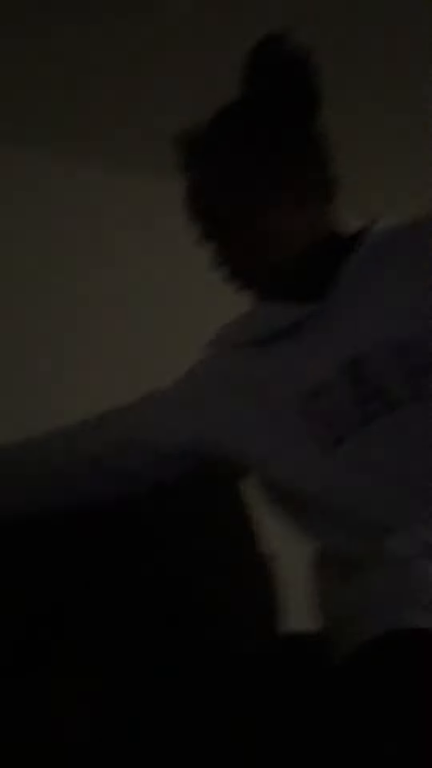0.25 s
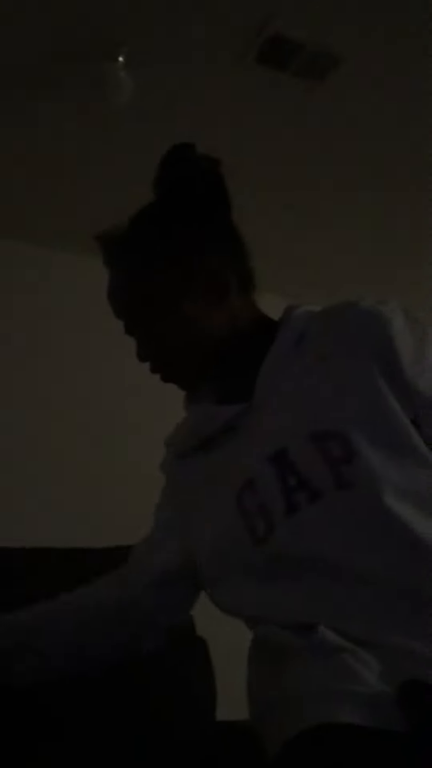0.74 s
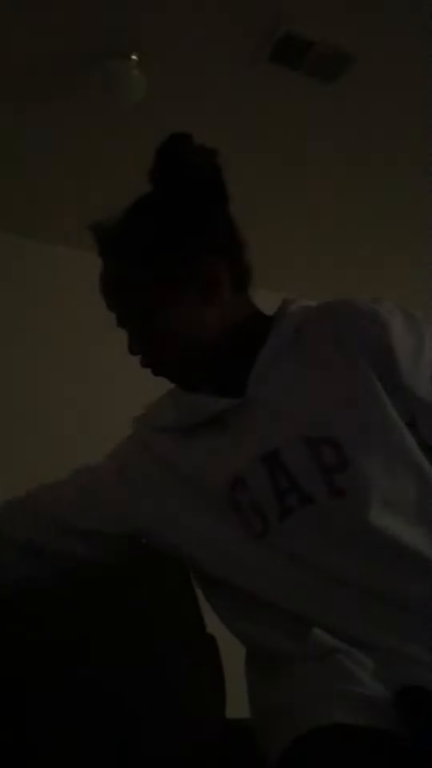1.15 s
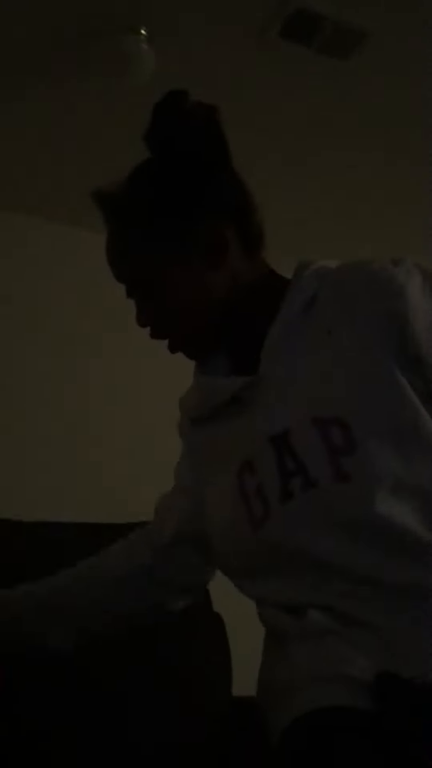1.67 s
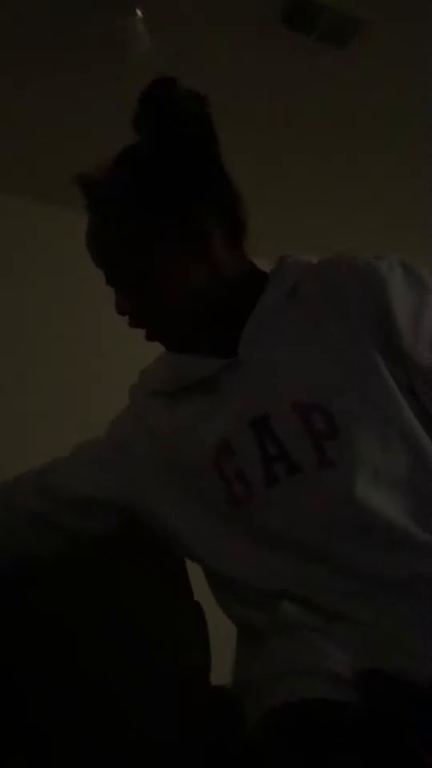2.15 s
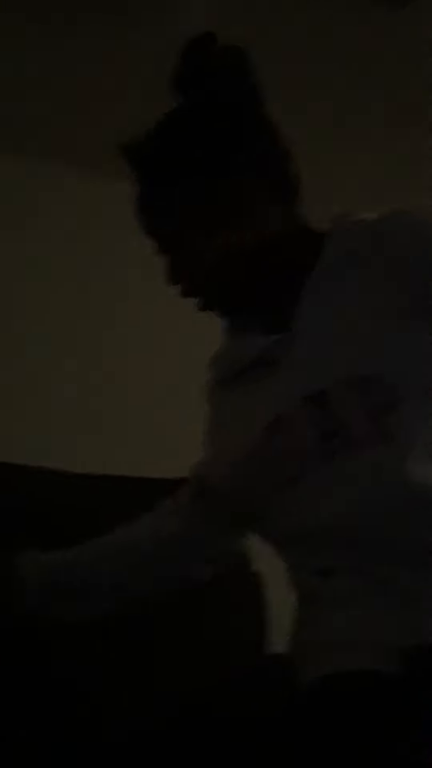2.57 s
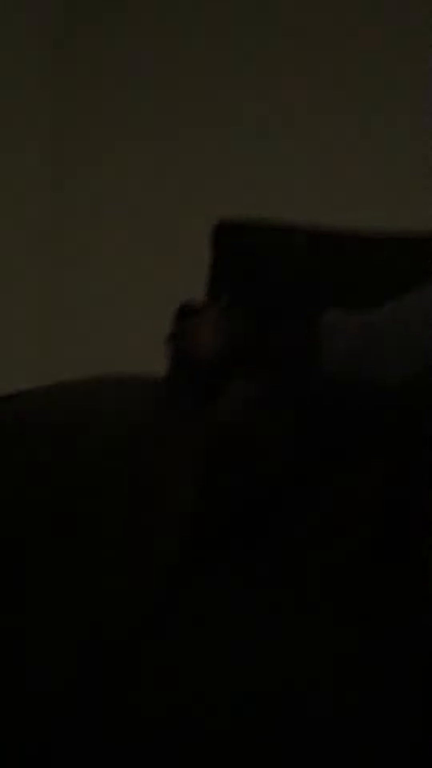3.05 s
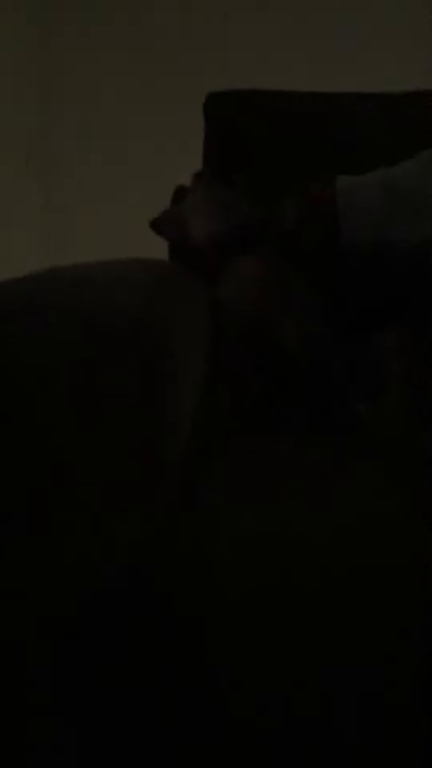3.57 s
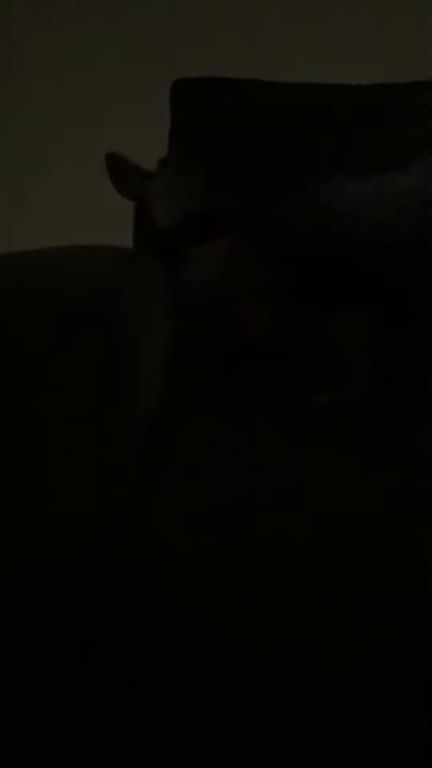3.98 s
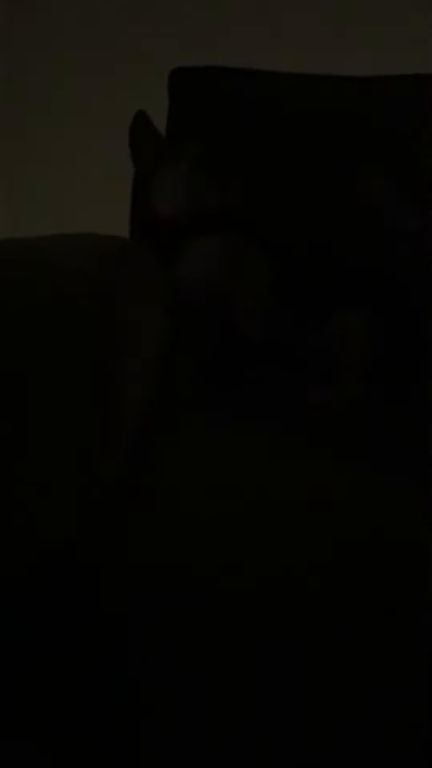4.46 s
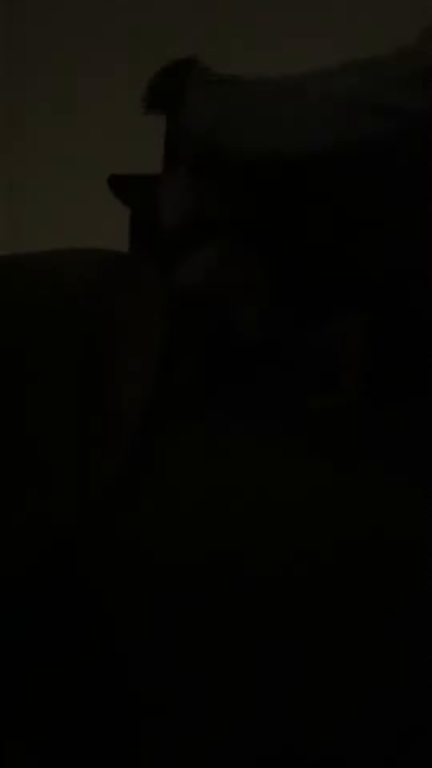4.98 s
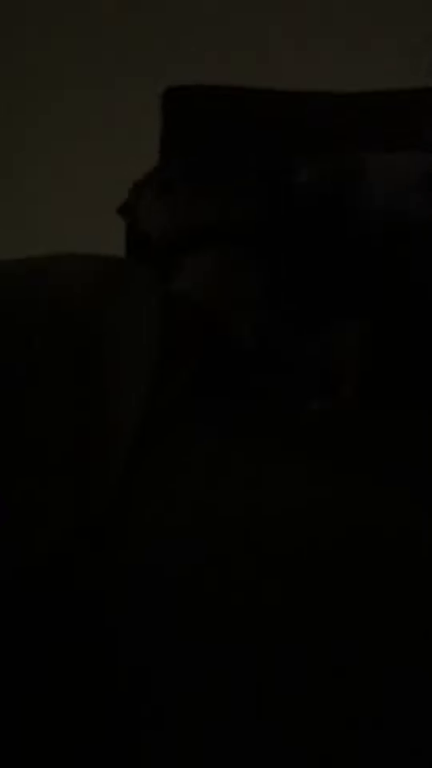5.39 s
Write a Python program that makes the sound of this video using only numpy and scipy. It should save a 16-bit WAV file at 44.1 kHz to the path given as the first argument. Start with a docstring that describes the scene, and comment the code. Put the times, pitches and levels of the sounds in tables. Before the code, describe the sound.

A hand squeezes a small rubber toy in a quiet furnished room. Tiny, bright, reedy chirps come at an even pace of just over two a second, then slow to three separated squeaks, the last loudest and highest. Each leaves a short room ring. Faint cloth rustles and dull ticks appear between, over smooth microphone hiss and a low distant hum.

```python
"""Rubber squeak toy in a furnished room

A hand squeezes a rubber toy: at each squeeze a reed squeaker chirps for some 40-50 ms. The reed gives
a pulse train of gliding pitch, the toy's resonances colour it, and the room rings on.
Cloth rustles faintly as swelling noise with small dull ticks; an appliance hums far off as wavering
sine lines over a low rumble; and a small microphone adds a smooth hiss."""
import sys
import numpy as np
from scipy import signal
from scipy.fft import rfft, irfft, next_fast_len
from scipy.io import wavfile
from scipy.ndimage import map_coordinates

SR = 44100
rng = np.random.default_rng(int(sys.argv[2]) if len(sys.argv) > 2 else 0)


def nominal_scale(level):
    """Amplitude ratio for a level in decibels (scalar or array-like)."""
    x = np.asarray(level, float) / 20
    return 10 ** x


def int16_out(signal):
    """Quantize to a 16-bit WAV file."""
    q = np.round(np.clip(np.atleast_2d(signal).T, -1, 1) * 32767)
    wavfile.write(sys.argv[1], SR, q.astype(np.int16))


N = 248150  # samples in the scene
LEAD = SR // 2  # samples before time zero, so that an earlier squeak can still ring
STIR_S = .008  # the reed stirs this long before it speaks
TOP_HZ = 15850  # upper band limit


def unit(x):
    """Normalization: scales a signal to rms 1."""
    return x / np.sqrt(np.mean(x ** 2) + 1e-20)


def along(points, hz):
    """Logarithmic frequency scale: interpolates (f/Hz, value) points on it."""
    f, value = np.transpose(points)
    return np.interp(np.log(hz + 1), np.log(f + 1), value)


def wobble(length, rate):
    """Band-limited fluctuation: a spline through random knots, rate of them a second."""
    knots = rng.standard_normal(int(length * rate / SR) + 4)
    return map_coordinates(knots, [np.arange(length) * rate / SR])


def filtered(x, response):
    """Linear filtering: the spectrum times a complex response of frequency."""
    size = 2 * next_fast_len(len(x) // 2 + 2048)
    spectrum = rfft(x, size) * response(np.fft.rfftfreq(size, 1 / SR))
    return irfft(spectrum, size)[:len(x)]


def noise(spectrum):
    """Coloured noise: white noise shaped by a spectral envelope, at rms 1."""
    white = rng.standard_normal(N)
    return unit(filtered(white, lambda hz: nominal_scale(along(spectrum, hz))))


def causal(gain):
    """Minimum phase: folding the cepstrum onto positive time gives the causal response of this gain."""
    cepstrum = irfft(np.log(gain + 1e-6))
    half = len(cepstrum) // 2
    cepstrum[1:half] *= 2
    cepstrum[half + 1:] = 0
    return np.exp(rfft(cepstrum))


def hiss():
    """Microphone self-noise: stationary coloured noise whose level barely drifts."""
    # microphone noise spectrum: f/Hz, relative density level/dB
    density = [(82, -42), (140, -9.5), (181, -7), (305, -11), (473, -15.5), (512, -19), (827, -16),
               (1330, -16), (2580, -22), (4880, -29.5), (13500, -35.5), (15500, -35), (16500, -58)]
    drift_db = 0.17 * wobble(N, 1.7)
    return nominal_scale(-56.5 + drift_db) * noise(density)


def rumble():
    """Modulated low-frequency noise: a slow level course with random lumps on it."""
    # rumble spectrum: f/Hz, relative density level/dB
    density = [(12, -60), (20, -22.5), (46, -5), (59, 8), (76, -1.5), (95, 1), (120, -31.5), (210, -120)]
    # course of the rumble before its lumps: t/s, level/dB
    course = [(0, -56), (.6, -54), (1.4, -60), (2.5, -53), (3.3, -52), (3.95, -60), (4.5, -52), (5.63, -50)]
    course_db = np.interp(np.arange(N) / SR, *np.transpose(course))
    lumps_db = 1.5 * wobble(N, 4)
    return nominal_scale(course_db + lumps_db) * noise(density)


def hum():
    """Line spectrum: sinusoids broadened by small random changes of level and frequency."""
    # lines of the far appliance: mean f/Hz, mean rms level/dB, scale of frequency wander/Hz
    lines = [(58.2, -64.5, 2.6), (104.9, -54, 1.5), (185, -71, 6.6), (226, -70.5, 1), (477, -72.5, 2)]
    total = np.zeros(N)
    for hz, db, width in lines:
        level = np.sqrt(2) * nominal_scale(db + 0.61 * wobble(N, 22))
        phase = 2 * np.pi * np.cumsum(hz + width * wobble(N, 15)) / SR
        total += level * np.sin(phase)
    return total


def cloth():
    """Friction noise: grainy coloured noise under envelopes that rise and fall exponentially."""
    # quick creases of cloth: t/s, peak level/dB
    snaps = [(2.409, -57), (2.91, -61), (5.239, -49.5), (5.32, -58)]
    # slow rubs of cloth and cushion: t/s, peak level/dB, rise and fall time constant/s
    rubs = [(4.101, -56, 0.08), (4.4, -61, .06), (4.569, -55, .036), (5.08, -57, 0.038), (5.47, -57, 0.077)]
    # cloth spectrum before its grain: f/Hz, relative density level/dB
    density = [(500, -27), (1200, -6.5), (4000, 3.5), (7000, 3.5), (12000, 1.5), (16000, 4)]
    snap_rise_s, snap_fall_s = .004, .031
    moves = [(s, db, snap_rise_s, snap_fall_s) for s, db in snaps]
    moves += [(s, db, width, width) for s, db, width in rubs]
    t = np.arange(N) / SR
    swell = np.zeros(N)
    for s, db, rise, fall in moves:
        exponent = np.where(t < s, (t - s) / rise, (s - t) / fall)
        swell += nominal_scale(db) * np.exp(exponent)
    grain_db = 1.4 * wobble(N, 150)
    return swell * unit(noise(density) * nominal_scale(grain_db))


def ticks():
    """Damped free vibration: sinusoids that decay by 60 dB in 20 ms."""
    # small dull ticks: t/s, initial level/dB, f/Hz
    knocks = [(2.031, -43, 394), (2.838, -46, 804), (5.083, -43, 900)]
    t = np.arange(N) / SR
    total = np.zeros(N)
    for s, db, hz in knocks:
        since = np.maximum(t - s, 0)
        total += nominal_scale(db - 60 * since / 0.02) * np.sin(2 * np.pi * hz * since)
    return total


def room():
    """Reverberation: discrete early reflections, then a tail in which each frequency has its own decay."""
    # reverberant tail: f/Hz, 60 dB decay time/s, energy level/dB
    reverberation = [(1300, .42, -9), (3000, .45, -8), (6000, .45, -8), (10000, .3, -8), (16000, .2, -10)]
    # first reflections: nominal delay/ms, level/dB
    walls = [(2.1, -11.5), (4.6, -17), (7.3, -20), (10.4, -14.5), (14.2, -15.5), (19, -15)]
    bands, t60, db = np.transpose(reverberation)
    hz, t, z = signal.stft(rng.standard_normal(int(.7 * SR)), SR, nperseg=256)
    t60 = along(np.c_[bands, t60], hz)[:, None]
    db = along(np.c_[bands, db], hz)[:, None]
    # the root divides out the decay time, so that the level column alone sets the energy
    decay = nominal_scale(db - 60 * t / t60) / np.sqrt(t60 * SR / (2 * np.log(1000)))
    tail = signal.istft(z * decay, SR, nperseg=256)[1]
    tail = tail * np.clip((np.arange(len(tail)) / SR - .003) / 0.0048, 0, 1)  # fades in from 3 ms
    ms, wall_db = np.transpose(walls)
    moved = rng.uniform(.85, 1.15, len(ms))  # the toy is never quite in the same place
    sign = np.sign(rng.standard_normal(len(ms)))
    tail[(ms * moved * SR / 1000).astype(int)] += nominal_scale(wall_db) * sign
    return tail


def squeeze(start, hold, let_go, db, first_hz, turn_hz, last_hz):
    """Pressure-controlled pitch: rows (t/s, f/Hz, level/dB) of bite, glide with one turn, and let-go."""
    turn = .4  # share of the hold after which the pitch changes course
    # the reed cannot be driven much above its ceiling; a larger knee bends more sharply
    ceiling_hz, knee = 2350., 14.
    bite_db, bite_s = 2, .004  # the first push of the fingers is harder than the hold
    swell_db_per_hz, droop_db_per_hz = .007, .0265  # above, below the starting pitch
    sag_hz_per_s = 45000  # pitch fall as the hand lets go
    # the further above its stall pitch, the more level the reed loses in the let-go
    stall_hz, fade_db_per_hz = 1050, .019

    s = np.linspace(0, hold, num=16)
    driven = np.interp(s, [0, turn * hold, hold], [first_hz, turn_hz, last_hz])
    hz = (driven ** -knee + ceiling_hz ** -knee) ** (-1 / knee)
    slope = np.where(hz > hz[0], swell_db_per_hz, droop_db_per_hz)
    level = db + slope * (hz - hz[0]) + bite_db * np.exp(-s / bite_s)
    end_hz = hz[-1] - sag_hz_per_s * let_go
    end_db = level[-1] - fade_db_per_hz * (hz[-1] - stall_hz)
    rows = np.vstack([np.c_[s, hz, level], (hold + let_go, end_hz, end_db)])
    return rows + [start, 0, 0]


def reed(rows):
    """Self-sustained reed: it snaps shut once a cycle, a harmonic pulse train with air noise in step."""
    s, hz, db = np.transpose(rows)
    t = np.arange(int((s[-1] - s[0] + 0.0035 + STIR_S) * SR)) / SR - STIR_S
    now = t + s[0]
    speaking = np.maximum(t, 0)
    held_hz = np.interp(now, s, hz)
    pressure_db = np.interp(now, s, db)
    overblown = np.clip((held_hz - 1600) / 300, 0, 1)  # driven far above rest pitch it beats unevenly
    slack = np.clip((now - s[-2]) / (s[-1] - s[-2]), 0, 1)  # grows from 0 to 1 over the let-go

    scoop = 1 - .06 * np.exp(-speaking / .0012)  # starts a little flat
    jitter = 1 + .0032 * (1 + 3 * overblown) * wobble(len(t), 300)
    pitch = held_hz * scoop * jitter
    phase = 2 * np.pi * np.cumsum(pitch) / SR

    k = np.arange(1, 16)[:, None]  # harmonic numbers
    # higher overtones waver more as the fingers move
    flutter_db = 1.22 * np.array([wobble(len(t), 91.6) for _ in k]) * np.sqrt(k)
    soft_db = -2.5 * k * slack  # a slack reed closes gently and loses its overtones
    audible = k * pitch < TOP_HZ + 900
    pulses = np.sum(nominal_scale(flutter_db + soft_db) * np.cos(k * phase) * audible, axis=0)

    # a harder squeeze blows more air past the reed, and so does the let-go
    air_db = -18.5 + 0.21 * (pressure_db + 12) + 7 * slack + 6 * overblown
    air = nominal_scale(air_db) * rng.standard_normal(len(t)) * (1 + np.cos(phase))

    onset = 1 - np.exp(-(speaking / 0.0008) ** 2)
    release = np.exp(-np.maximum(now - s[-1], 0) / 0.0031)
    # it swings freely before it first shuts
    stirring = nominal_scale(-13) * np.exp(-np.abs(t) / .0016) * (np.cos(phase) + np.cos(2 * phase))
    return ((pulses + air) * onset * release + stirring) * nominal_scale(pressure_db)


def modes(table, f):
    """Resonance: summed power gain of modes, each applied twice so that the valleys stay dark."""
    total = 0
    for center, width, db in table:
        damping = (f * width) ** 2
        resonance = damping / ((center * center - f * f) ** 2 + damping)
        total = total + nominal_scale(db) ** 2 * resonance ** 2
    return total


def body_gain(f, shades_db):
    """Modal superposition: the powers of the toy's resonance groups add, each shaded by its own level."""
    # six groups, low to high: hollow, belly, neck, nozzle, edge, top
    # each mode: f/Hz, width before it is applied twice/Hz, level before shading/dB
    pipe = [
        [(1380, 1300, -2)],
        [(2070, 1700, -2.5), (2790, 1400, -1)],
        [(4260, 1000, 0.5)],
        [(5804, 1100, 0), (6167, 1130, 2), (6800, 640, -6.5)],
        [(9080, 2200, 2), (11670, 2500, 2)],
        [(14420, 1600, 3.5), (15500, 1100, -8)],
    ]
    return np.sqrt(sum(nominal_scale(db) ** 2 * modes(part, f) for db, part in zip(shades_db, pipe)))


def toy():
    """Source-filter principle: each reed chirp excites the toy as it is held, then the room."""
    # squeezes: start t/s, hold/s, let-go/s, pressure level before bite and pitch changes/dB,
    # driven reed pitch before the ceiling at the start, turn and end of the hold: f/Hz, f/Hz, f/Hz
    presses = [(-.21, 0.042, .01, -23, 1308, 1430, 1430), (0.3271, .0325, 0.0096, -17, 1402, 1590, 1570),
               (0.754, .038, 0.0073, -23, 1325, 1420, 1375), (1.2416, .05, 0.0024, -22.5, 1301, 1258, 1186),
               (1.6821, .048, 0.0016, -24.5, 1253, 1248, 1138),
               (2.123, 0.034, 0.0075, -19.5, 1343, 1390, 1402),
               (2.5605, .042, 0.0048, -25, 1236, 1255, 1271),
               (2.9479, .046, 0.0012, -22.5, 1248, 1195, 1090),
               (3.8169, .0332, 0.013, -15, 1320, 1398, 1660), (4.887, .039, .011, -20, 1495, 1495, 1555),
               (5.554, .034, 0.0085, -11.5, 1500, 1714, 2520)]
    # how the hand shades the toy at each squeeze: belly level/dB, neck level/dB, nozzle level/dB, top level/dB
    grips = [(-13.5, -14.5, -0.5, -22.5), (-6, -9.5, 0.5, -17), (-2, -10, -2, -7.5), (-6.5, -9.5, 2, -17),
             (-7, -9, -3.5, -15.5), (-5.5, -9, -2.5, -10.5), (-6, -13, -5, -18), (-7, -15, -5.5, -19),
             (-2.5, -14.5, -3, -15), (-5, -7, -4, -6.5), (-3.5, -40, -2, -19)]
    out = np.zeros(N + LEAD + SR)
    for press, (belly_db, neck_db, nozzle_db, top_db) in zip(presses, grips):
        rows = squeeze(*press)
        hollow_db = -13 - 1.5 * (press[3] + 20)  # the lowest resonance weakens with pressure
        edge_db = -20
        shades_db = (hollow_db, belly_db, neck_db, nozzle_db, edge_db, top_db)
        source = np.pad(reed(rows), (0, SR // 100))
        direct = filtered(source, lambda f: causal(body_gain(f, shades_db)))
        # a louder squeak is nearer or aimed at the microphone, so drier
        near_db = np.max(rows, axis=0)[2] + 18
        sound = nominal_scale(-.22 * near_db) * signal.fftconvolve(direct, room())
        sound[:len(direct)] += direct
        start = LEAD + round((rows[0][0] - STIR_S) * SR)
        out[start:start + len(sound)] += sound
    return out[LEAD:LEAD + N]


def scene():
    """Superposition: the pressures of all sources add at one microphone."""
    background = hum() + rumble() + hiss()
    return (background + cloth() + ticks() + toy())[None]


def band_limit(x):
    """A steep low-pass at the top of the band."""
    return signal.sosfilt(signal.butter(12, 16800, fs=SR, output="sos"), x)


def record(dry):
    """Band limitation: above the limit the gain falls by 0.08 dB per Hz, down to -28 dB."""
    mix = filtered(dry[0], lambda hz: nominal_scale(np.clip(.08 * (TOP_HZ - hz), -28, 0)))
    return band_limit(mix[None])


dry = scene()
out = record(dry)
int16_out(out)
```